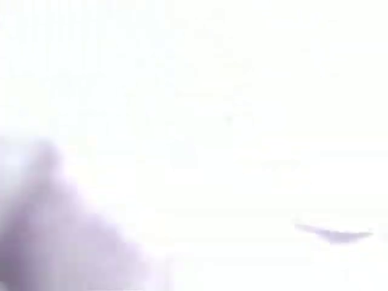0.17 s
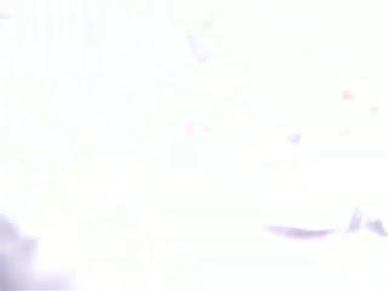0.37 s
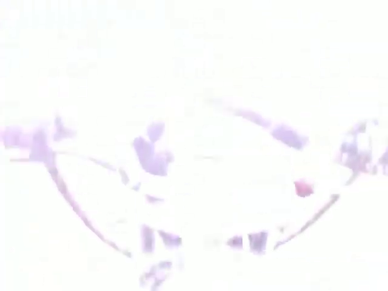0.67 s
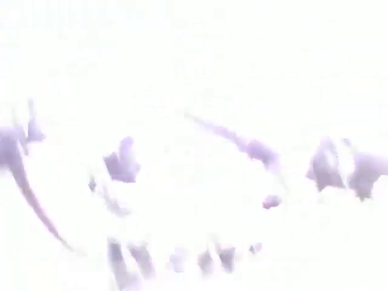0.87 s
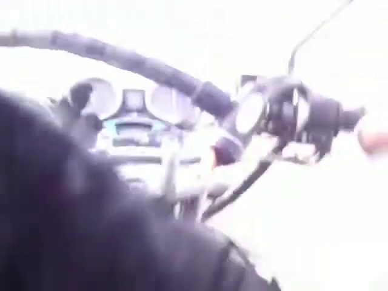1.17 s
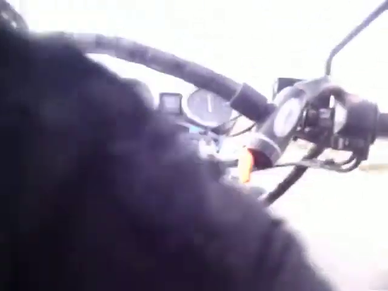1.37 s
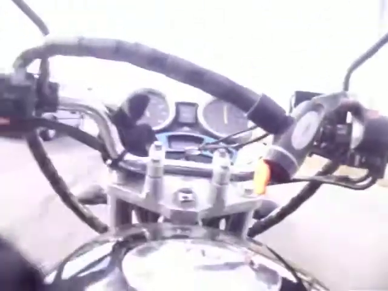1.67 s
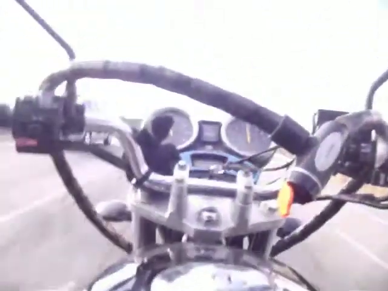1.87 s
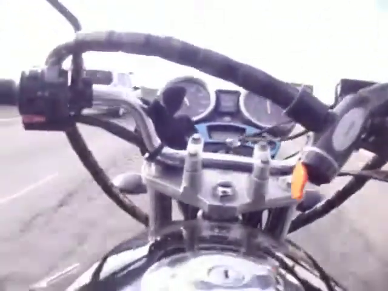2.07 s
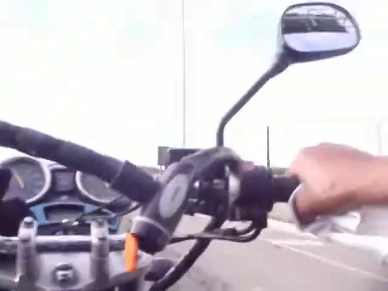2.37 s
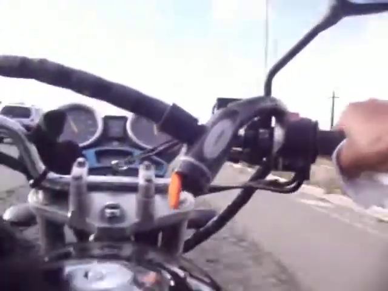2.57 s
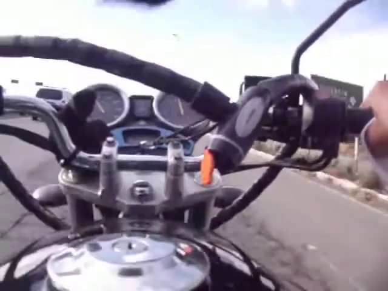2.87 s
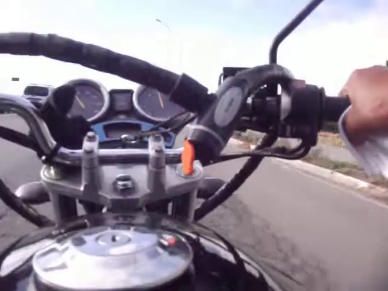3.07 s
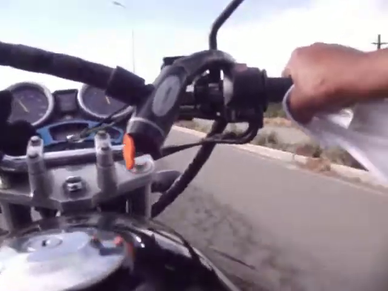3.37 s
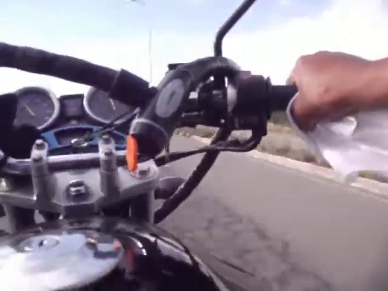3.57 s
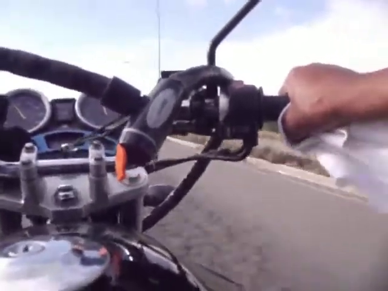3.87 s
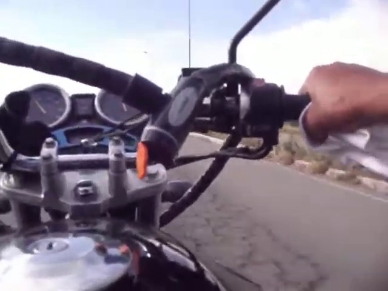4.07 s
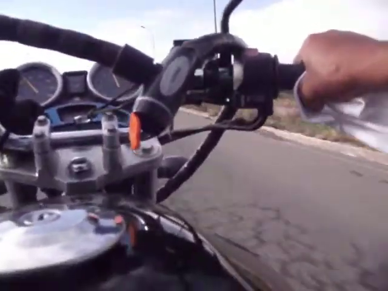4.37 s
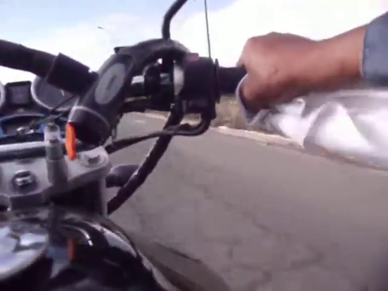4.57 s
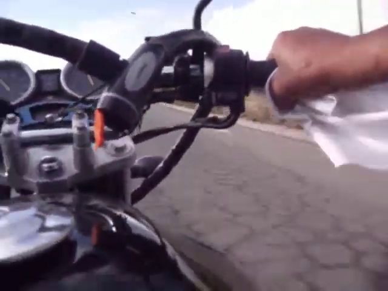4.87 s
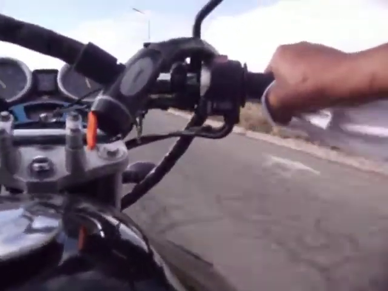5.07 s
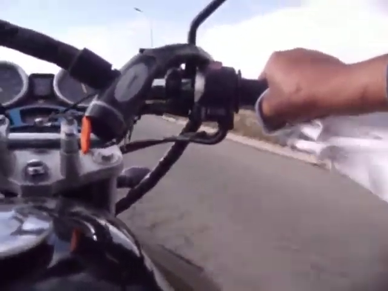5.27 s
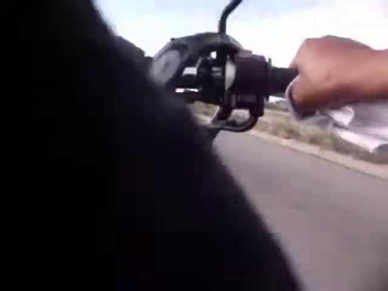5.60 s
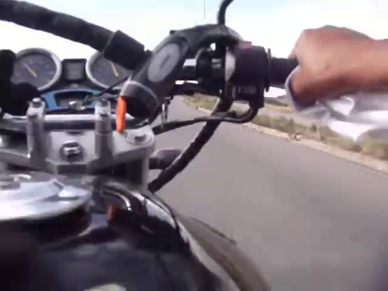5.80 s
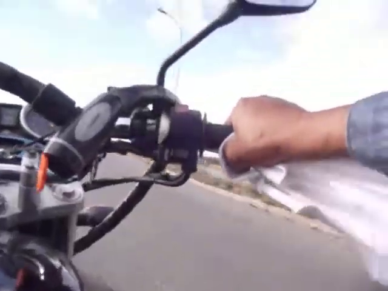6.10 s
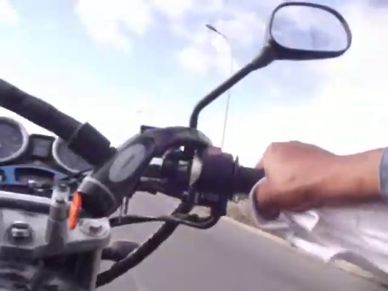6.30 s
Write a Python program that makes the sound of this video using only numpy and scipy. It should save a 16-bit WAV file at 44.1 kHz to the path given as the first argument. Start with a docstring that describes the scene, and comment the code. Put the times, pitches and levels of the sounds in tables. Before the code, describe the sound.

Outdoors on a moving motorcycle, airflow buffets a small camera's microphone with low flutter and crackly hiss. A hard clicking thump hits about one second in, small ticks follow, and a bigger gust blow clips past the middle. Near the end come loud knocks and rough strap scrapes against the case, then wind alone. Treble is dull.

```python
"""Throughout, the airstream rumbles over the microphone port of a small camera on a motorcycle.
Turbulent pressure buffets the port, and broadband hiss spits in short bursts; both are shaped random noise.
A steady floor of noise holds low road rumble and faint recorder hiss. Small hardware ticks and rings as
decaying modes, and near the end a loose strap scrapes across the case as bursts of rough noise.
The hardest peaks clip at the input, and the treble is dull."""
import sys
import numpy as np
from scipy.fft import rfft, irfft, next_fast_len
from scipy.io import wavfile
from scipy.ndimage import map_coordinates

SR = 44100
rng = np.random.default_rng(int(sys.argv[2]) if len(sys.argv) > 2 else 0)


def generate_wav(signal):
    """Clip the signal to [-1, 1] and save it as 16-bit WAV at the path in sys.argv[1]."""
    frames = np.transpose(np.atleast_2d(signal))
    scaled = np.clip(frames, -1, 1) * 32767
    pcm = np.round(scaled).astype(np.int16)
    wavfile.write(sys.argv[1], SR, pcm)


N = 284003  # length [samples]


def amp(db):
    """Level law: decibels to amplitude gain."""
    return 10 ** (np.asarray(db) / 20)


def unit(x):
    """Normalisation: scale to rms 1."""
    return x / np.sqrt(np.mean(x ** 2) + 1e-20)


def clock():
    """Uniform sampling: the time of every sample [s]."""
    return np.arange(N) / SR


def along(points, hz):
    """Logarithmic pitch scale: (Hz, value) points interpolated over log frequency."""
    point_hz, value = np.transpose(points)
    return np.interp(np.log(hz + 1), np.log(point_hz + 1), value)


def curves(rows):
    """Linear interpolation: one curve over time for each column after the first."""
    times, *columns = np.transpose(rows)
    return [np.interp(clock(), times, column) for column in columns]


def wobble(rate):
    """Band-limited fluctuation: a smooth random curve with soft bounds, rate knots a second."""
    knots = rng.standard_normal(4096)
    bound = 1.4
    curve = map_coordinates(knots, [clock() * rate + 2], mode="wrap")
    return bound * np.tanh(curve / bound)


def filtered(x, gain):
    """Linear filtering: multiply the spectrum of x by a gain that depends on frequency."""
    size = next_fast_len(N + SR // 2)  # zero padding keeps the end from wrapping onto the start
    hz = np.fft.rfftfreq(size, 1 / SR)
    return irfft(rfft(x, size) * gain(hz), size)[:N]


def noise(spectrum):
    """Spectral shaping: white noise coloured by a spectrum and scaled to rms 1."""
    return unit(filtered(rng.standard_normal(N), lambda hz: amp(along(spectrum, hz))))


def add(track, s, sound):
    """Superposition: mix a sound into the track from time s."""
    start = round(s * SR)
    part = sound[max(-start, 0):max(N - start, 0)]
    track[max(start, 0):][:len(part)] += part


def bell(t, length):
    """Gaussian envelope, rising a little faster than it falls; power exceeds half for the given length."""
    rise = .42  # share of the length spent rising
    from_top = t / length + .5 - rise
    side_width = np.where(from_top < 0, rise, 1 - rise)
    return 2 ** (-.5 * (from_top / side_width) ** 2)


def bursts(rows, stretch):
    """Amplitude modulation: an envelope of swells from (s, dB, length) rows, lengths times stretch."""
    envelope, t = np.zeros(N), np.arange(-SR // 4, SR // 4) / SR
    for s, db, length in rows:
        add(envelope, s + t[0], amp(db) * bell(t, length * stretch))
    return envelope


def chance_events(per_s, level_db, spread_db, typical, octaves):
    """Poisson process: random (s, dB, size) rows, scattered about a level curve and a typical size."""
    s = np.cumsum(rng.exponential(size=256)) / per_s
    scatter = np.clip(rng.standard_normal((len(s), 2)), -2, 2)
    db = np.interp(s, clock(), level_db) + spread_db * scatter[:, 0]
    size = typical * 2 ** (octaves * scatter[:, 1])
    return np.column_stack([s, db, size])[s < N / SR]


# slow pressure of the airstream: (frequency [Hz], relative density [dB per Hz])
BUFFET_SPECTRUM = [(8, -6.5), (25, 0.5), (55, -1.5), (100, -9.5), (200, -17.5), (380, -27), (700, -42.5),
                   (1500, -90.5), (5000, -120)]


def buffet(pressure_db, flutter):
    """Turbulent pressure fluctuation: slow lumps of pressure push on the port."""
    return amp(pressure_db + 2.5) * unit(noise(BUFFET_SPECTRUM) * amp(3.7 * flutter))


EDDY_S = 0.0088  # time an eddy takes to pass the port
# churning wake: (frequency [Hz], relative density [dB per Hz])
WAKE_SPECTRUM = [(30, -14.5), (110, -2), (200, -2.5), (320, -6), (500, -13), (800, -19), (1500, -38.5),
                 (5000, -120)]


def wake(churn_db, flutter, eddy_rows):
    """Energy cascade: the wake churns, and large eddies break into smaller ones."""
    breakup_rows = [(s, db, EDDY_S) for s, db, hz in eddy_rows]
    breakup = amp(-5.0) * bursts(breakup_rows, stretch=0.9)
    churning = amp(churn_db) * unit(amp(5.9 * flutter))
    return np.hypot(churning, breakup) * noise(WAKE_SPECTRUM)


SPITS_PER_S, SPIT_OVER_FLOW_DB, SPIT_SPREAD_DB = 20, 7.5, 2  # lesser bursts grow with the flow
SPIT_S, SPIT_SPREAD_OCTAVES = .0045, 0.5  # typical length before stretching, and its scatter
HISS_LIMIT_DB = -11.5  # the narrow port lets only so much turbulence through
# fine turbulence, stronger as the port faces the wind: (time [s], relative level [dB])
FLOW = [(0.0, -38.5), (0.37, -40.5), (0.67, -26.5), (1.0, -33.5), (1.22, -25), (1.6, -32.5), (2.1, -35.5),
        (2.45, -30), (2.72, -39), (2.85, -38.0), (3.12, -44.5), (3.6, -39.5), (3.87, -31), (4.15, -39.5),
        (4.45, -31), (5.17, -45.5), (5.28, -34.5), (5.98, -35), (6.44, -31.0)]
# strongest bursts of fine turbulence: (time [s], relative level [dB], length before stretching [s])
STRONG_SPITS = [(0.206, -27, 0.028), (0.464, -23.5, 0.0045), (0.506, -23, 0.0067), (0.617, -20, 0.0036),
                (0.79, -20.5, 0.0043), (0.932, -22.5, 0.01), (1.057, -19, 0.013), (1.1, -16.5, 0.019),
                (1.164, -14.5, 0.0079), (1.226, -12.5, 0.0088), (1.272, -16.5, 0.0053),
                (1.298, -13, 0.0042), (1.431, -20, 0.025), (1.504, -20.5, 0.015), (1.94, -17, 0.016),
                (2.185, -17, 0.0036), (2.395, -21, 0.065), (2.503, -19.5, 0.025), (2.58, -21.5, 0.089),
                (2.921, -24, 0.0078), (2.998, -17, 0.016), (3.232, -26.5, 0.0082), (3.388, -22.5, 0.0057),
                (3.431, -25.5, 0.013), (3.492, -22.5, 0.0031), (3.674, -4, 0.011), (3.857, -23, 0.024),
                (3.985, -21.5, 0.015), (4.308, -21, 0.016), (4.486, -26, 0.031), (4.662, -17.5, 0.004),
                (4.855, -25, 0.038), (5.059, -28.5, 0.015), (5.106, -26, 0.0054), (5.255, -27, 0.039),
                (5.802, -24.5, 0.02), (6.067, -26.5, 0.013), (6.23, -26.5, 0.045)]
# hiss of fine turbulence: (frequency [Hz], relative density [dB per Hz])
TURBULENCE_SPECTRUM = [(40, -14), (130, 3.5), (300, 3), (600, 2), (1200, -1), (1900, -2), (2500, -0.5),
                       (2950, 2), (3400, -10), (4000, -20), (5000, -33), (5700, -41.5), (6300, -64.5),
                       (9000, -120)]


def turbulence(flutter):
    """Intermittency: fine turbulence hisses, flaring in bursts as the flow tears off the case."""
    flow_db, = curves(FLOW)
    lesser_spits = chance_events(SPITS_PER_S, flow_db + SPIT_OVER_FLOW_DB, SPIT_SPREAD_DB,
                                 SPIT_S, SPIT_SPREAD_OCTAVES)
    steady = amp(flow_db + 1.74) * unit(amp(4.55 * flutter + 1.4 * wobble(22)))
    strong_flares = amp(4.0) * bursts(STRONG_SPITS, stretch=0.72)
    lesser_flares = bursts(lesser_spits, stretch=0.65)
    flares = np.hypot(strong_flares, lesser_flares)
    grain = unit(amp(6.2 * wobble(330)))  # the smallest eddies make the hiss crackle
    limit = amp(HISS_LIMIT_DB)
    envelope = limit * np.tanh(np.hypot(steady, flares) * grain / limit)
    return envelope * noise(TURBULENCE_SPECTRUM)


def eddies(rows, level_db):
    """Vortex passage: each eddy swings the pressure at the port in a brief oscillation."""
    pressure, t = np.zeros(N), np.arange(-SR // 20, SR // 20) / SR
    phases = rng.uniform(0, 2 * np.pi, size=512)
    for (s, db, hz), phase in zip(rows, phases):
        swing = np.cos(2 * np.pi * hz * t + phase)
        add(pressure, s + t[0], amp(db + level_db) * bell(t, EDDY_S) * swing)
    return pressure


# lesser eddies come at random out of the wake
EDDIES_PER_S, EDDY_OVER_WAKE_DB, EDDY_SPREAD_DB = 14, 2, 2.5
EDDY_HZ, EDDY_SPREAD_OCTAVES = 114, .5
# gusts swell both levels: (time [s], slow pressure [relative dB], churning of the wake [relative dB])
RUMBLE = [(0.0, -30, -30), (0.36, -24.5, -31), (0.72, -20.5, -25), (1.0, -23.5, -28), (1.12, -14, -18),
          (1.55, -18.5, -26.5), (2.1, -20.0, -26), (2.58, -21, -21.5), (2.72, -26, -29), (2.98, -20.5, -26),
          (3.13, -28.5, -42.5), (3.26, -18.0, -30.5), (3.62, -22, -31.5), (3.74, -10, -22),
          (3.95, -16, -19.5), (4.12, -20, -32.5), (4.42, -20, -19.5), (4.75, -19.5, -29),
          (5.17, -20, -31.5), (5.3, -19, -23.5), (6.1, -17.0, -31.5), (6.44, -21, -25)]
# strongest eddies that hit the port: (time [s], relative level [dB], frequency [Hz])
STRONG_EDDIES = [(1.082, 11.5, 45), (1.097, -6.5, 90), (1.143, -7, 108), (1.648, -9.5, 103),
                 (1.938, -12, 68), (1.968, -11, 110), (3.674, 10, 173), (3.691, 14, 46), (3.72, -4, 47),
                 (3.768, -7, 130), (3.848, -4, 130), (3.988, -3, 148), (4.078, -9, 114),
                 (4.221, -12.5, 103), (4.544, -14, 160), (4.612, -12.5, 91), (4.827, -14, 153),
                 (5.058, -5, 144), (5.105, -15.5, 152), (5.492, -2.5, 61), (6.062, -13.5, 90)]


def wind():
    """Superposed scales of turbulence: slow pressure, wake, fine hiss and single eddies."""
    pressure_db, churn_db = curves(RUMBLE)
    lesser_eddies = chance_events(EDDIES_PER_S, churn_db + EDDY_OVER_WAKE_DB, EDDY_SPREAD_DB,
                                  EDDY_HZ, EDDY_SPREAD_OCTAVES)
    eddy_rows = [*STRONG_EDDIES, *lesser_eddies]
    flutter = wobble(80)  # small eddies drive rumble and hiss together
    low = buffet(pressure_db, flutter) + wake(churn_db, flutter, eddy_rows)
    return low + turbulence(flutter) + eddies(eddy_rows, level_db=2.1)


# low road rumble with faint recorder hiss: (frequency [Hz], relative density [dB per Hz])
FLOOR_SPECTRUM = [(20, 1), (50, -12), (100, -9), (190, -21.5), (350, -25), (600, -33.5), (1500, -45),
                  (3000, -42), (3800, -49), (5200, -49), (5700, -58), (6400, -98.5), (9000, -120)]


def steady_floor():
    """Stationary noise: low road rumble with faint recorder hiss lies steadily under the wind."""
    return amp(-28.0 + 0.94 * wobble(8)) * noise(FLOOR_SPECTRUM)


TICK_HZ, TICK_SAG_HZ_PER_DB = 2575, 13.5  # a harder contact pings lower
# hardware contacts: (time [s], tick [relative dB], metal ring [relative dB], ring brightness [dB per octave])
CONTACTS = [(1.069, 3.5, -53, -1), (1.08, 8.5, -43, -1), (1.525, -19.5, -32.5, -3), (1.6, -10.5, -46, -2),
            (1.656, -28, -31.5, -5), (1.733, -16.5, -30.5, 4), (1.767, -22, -31, 4.5),
            (2.338, -3.5, -34, -6), (2.893, -38, -40, -12), (3.04, -5.5, -29.5, -13),
            (3.345, -19.5, -47, -3), (4.238, -4, -30, -17), (4.298, -17, -26, -4.5),
            (4.717, -8.5, -44, -11), (5.21, -29, -32.5, -2.5), (5.235, -1.5, -43.5, -6),
            (5.415, -4, -35.5, -9), (5.446, -12.5, -26, -5), (5.461, -6, -28.5, -7),
            (5.503, -2.5, -3, -4.5), (5.575, 0, -7, -3), (5.587, -3.5, -44, 0)]
# modes of the metal fitting: (frequency [Hz], relative level [dB], undamped 60 dB decay time [s])
METAL_MODES = [(1697, -3.5, 0.15), (2960, -6.5, 0.22)]
# rubbing on the case, in contact cracks and strap drags: (frequency [Hz], relative density [dB per Hz])
SCRAPE_SPECTRUM = [(100, -1), (400, 4), (1000, -8.5), (1750, 0), (2200, -1), (2900, 3.5), (3700, -14),
                   (5200, -30), (6500, -51), (9000, -120)]


def hardware(tick_t60, tick_db, crack_db, crack_t60, ring_db):
    """Modal excitation: a contact cracks, pings the microphone cavity and rings the metal fitting."""
    out, cracks, t = np.zeros(N), np.zeros(N), np.arange(SR // 4) / SR
    onset = 1 - np.exp(-t / 0.00044)
    lowest_hz = METAL_MODES[0][0]
    for s, db, metal_db, bright_db in CONTACTS:
        hz = TICK_HZ - TICK_SAG_HZ_PER_DB * db
        tick_decay = amp(db + tick_db - 60 * t / tick_t60)
        add(out, s, onset * np.sin(2 * np.pi * hz * t) * tick_decay)
        add(cracks, s, onset * amp(db + crack_db - 60 * t / crack_t60))
        damping = 1 + 6 * amp(metal_db)  # a hard blow presses the fitting against the case
        for mode_hz, mode_db, t60 in METAL_MODES:
            # the point of contact decides how much the upper mode takes
            tilt_db = bright_db * np.log2(mode_hz / lowest_hz)
            level_db = metal_db + ring_db + mode_db + tilt_db
            ring_decay = amp(level_db - 60 * t * damping / t60)
            add(out, s, onset * ring_decay * np.sin(2 * np.pi * mode_hz * t))
    return out + cracks * noise(SCRAPE_SPECTRUM)


# strap strikes and drags: (time [s], relative level [dB], length before stretching [s])
STRAP_DRAGS = [(5.240, -6.5, 0.0055), (5.477, -1, 0.0032), (5.484, -0.5, 0.014), (5.507, -7.5, 0.011),
               (5.590, -14.5, 0.02)]


def strap():
    """Friction noise: webbing drags over the case in rough, very loud scrapes."""
    rough = unit(noise(SCRAPE_SPECTRUM) * amp(1.8 * wobble(450)))
    return amp(-0.5) * bursts(STRAP_DRAGS, stretch=0.84) * rough


def scene():
    """Linear superposition: every source adds into one channel."""
    knocks = hardware(tick_t60=0.0085, tick_db=5.5, crack_db=-0.5, crack_t60=0.013, ring_db=8.5)
    return (wind() + steady_floor() + knocks + strap())[None]


TOP_HZ = 16450  # upper edge of the band
# dull treble, thin above 6 kHz: (frequency [Hz], gain [dB])
DULL_TREBLE = [(5500, -0.5), (6200, -12), (8500, -7.5), (15000, -7), (16400, -14.5)]


def record(dry):
    """Overload and band limiting: the input clips flat on the hardest blows; the band ends steeply."""
    ceiling = .71  # of full scale, before the treble is dulled
    clipped = np.clip(dry[0], -ceiling, ceiling)
    return filtered(clipped, lambda hz: amp(along(DULL_TREBLE, hz)) * (hz < TOP_HZ))[None]


dry = scene()
out = record(dry)
generate_wav(out)
```